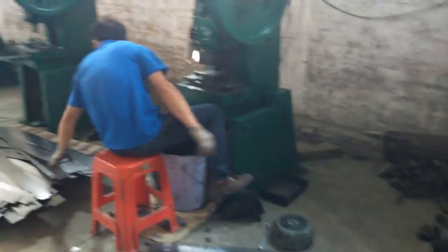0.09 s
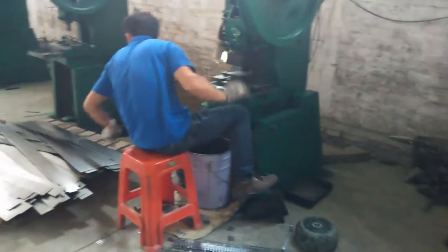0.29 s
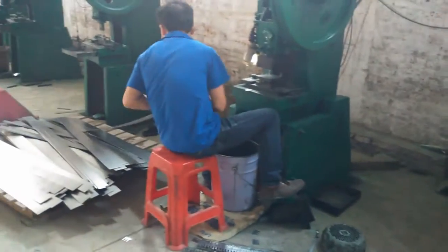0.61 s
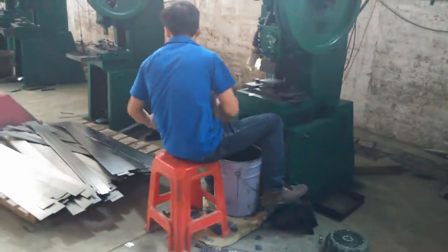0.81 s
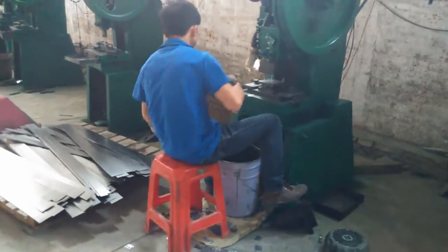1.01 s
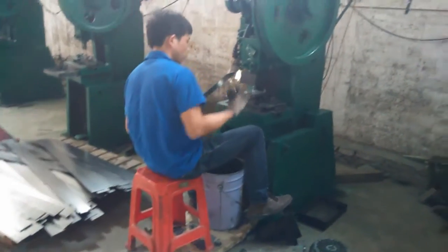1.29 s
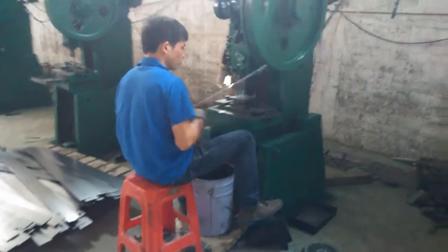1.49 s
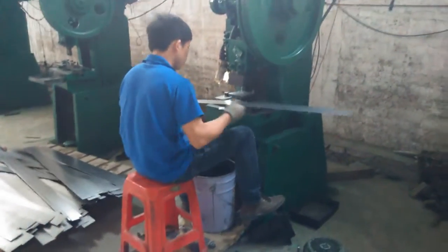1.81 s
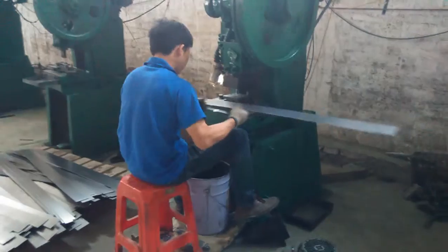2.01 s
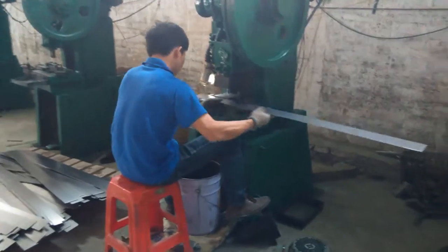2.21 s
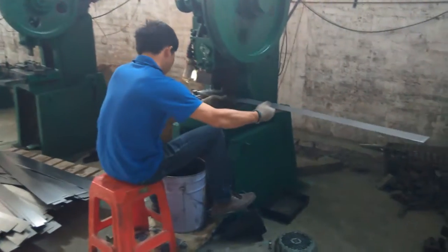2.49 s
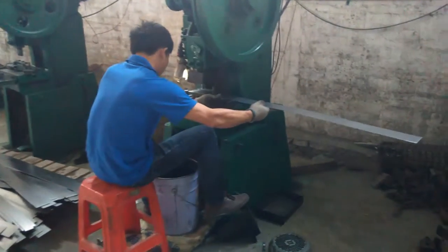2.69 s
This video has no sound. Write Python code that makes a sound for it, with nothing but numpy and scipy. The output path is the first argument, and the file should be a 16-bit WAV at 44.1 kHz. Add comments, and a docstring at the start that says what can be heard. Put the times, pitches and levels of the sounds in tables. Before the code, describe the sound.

Thin steel strip handling: bright raspy scrape first, a metallic clatter, deep springy wub-wub flexing, then a fine fading sliding hiss, mostly toward the left, over low idling machine rumble in a hard-walled workshop.

```python
"""Steel strip onto an idling punch press

A worker draws a long steel strip off a pile, swings it onto the press and slides it over the die.
Grains of noise make it hiss as it drags and clatter where it touches; a brief ring follows each grain.
Resonant noise and sinking tones boom as it flexes; wavering tones squeak at its edge.
The press motor and flywheel drone on as resonant noise in a bare workshop."""
import sys
import numpy as np
from scipy import signal
from scipy.fft import rfft, irfft
from scipy.io import wavfile
from scipy.ndimage import uniform_filter1d, map_coordinates

SR = 44100
rng = np.random.default_rng(int(sys.argv[2]) if len(sys.argv) > 2 else 0)


def waveform_to_disk(signal):
    """Save audio, clipped to [-1, 1], as 16-bit WAV at the path in sys.argv[1]."""
    frames = np.transpose(np.atleast_2d(signal))
    scaled = np.clip(frames, -1, 1) * 32767
    samples = np.round(scaled).astype(np.int16)
    wavfile.write(sys.argv[1], SR, samples)


N = 125685
T = np.arange(N) / SR


def amp(db):
    """Decibels to gain."""
    return 10 ** (np.asarray(db) / 20)


def unit(x):
    """Scale to rms 1."""
    return x / np.sqrt(np.mean(x ** 2))


def pan(db):
    """Left and right gains for a left-minus-right level, fixed or moving."""
    half = np.asarray(db) / 2
    gains = amp(np.array([half, -half]))
    return gains[:, None] if np.ndim(db) == 0 else gains


def freqs():
    """Frequency of each spectral bin, kept above zero for the logarithm."""
    return np.maximum(np.fft.rfftfreq(N, 1 / SR), 1)


def colour(x, points):
    """Shape the spectrum by (pitch_hz, relative_db) points, falling steeply beyond the ends; rms 1."""
    hz, db = np.array(points, float).T
    f = np.log(freqs())
    outside = np.maximum(np.log(hz[0]) - f, 0) + np.maximum(f - np.log(hz[-1]), 0)
    gain = amp(np.interp(f, np.log(hz), db) - 26 * outside)
    return unit(irfft(rfft(x) * gain, N))


def resonate(x, modes):
    """Pass through steep resonances, each width_hz wide about 9 dB below its peak; rms 1."""
    power = 0
    for hz, width, db in modes:
        detune = (freqs() - hz) / (0.36 * width)
        power = power + amp(db) ** 2 / (1 + detune ** 2) ** 2
    return unit(irfft(rfft(x) * np.sqrt(power), N))


def air(apart_hz):
    """Noise at two ears: alike in the bass, unrelated well above apart_hz."""
    mid, side = rng.standard_normal((2, N))
    alike = .9 / (1 + (freqs() / apart_hz) ** 4)
    shared = rfft(mid) * np.sqrt(1 + alike)
    opposed = rfft(side) * np.sqrt(1 - alike) * np.array([[1], [-1]])
    return irfft(shared + opposed, N)


def grains(per_s=3000, spread_db=-2.5):
    """Dense tiny impacts of steel on steel, each scattered differently toward the two ears."""
    strengths = amp(spread_db * np.minimum(rng.exponential(size=N), 4))
    impacts = (rng.random(N) < per_s / SR) * strengths
    # The energy of each impact fades with a time constant of 0.47 ms
    energy = signal.lfilter([1], [1, -np.exp(-1 / (0.00047 * SR))], impacts ** 2)
    return np.sqrt(energy + 1e-12) * rng.standard_normal((2, N))


def swell(start, rise, fade):
    """Linear rise, then exponential fade with time constant fade."""
    return np.clip((T - start) / rise, 0, 1) * np.exp(-np.maximum(T - start - rise, 0) / fade)


def sink(start, hz, glide_per_s):
    """A tone of rms 1 whose pitch falls from hz as a bend relaxes."""
    pitch = hz * np.exp(-glide_per_s * np.maximum(T - start, 0)) * (T >= start)
    return np.sqrt(2) * np.sin(2 * np.pi * np.cumsum(pitch) / SR)


def linger(x, t60, wet_db):
    """Add a dense decaying tail, different at each ear, keeping the overall power."""
    tail = rng.standard_normal((2, SR)) * np.exp(-np.log(1000) * T[:SR] / t60)
    tail /= np.sqrt(np.sum(tail ** 2, axis=1, keepdims=True))
    wet = signal.fftconvolve(x, tail, axes=1)[:, :N]
    return (x + amp(wet_db) * wet) / np.hypot(1, amp(wet_db))


def sway(x):
    """Let the pitch wander slightly, as under uneven running, by a random delay."""
    sway_s, sways_per_s = .0012, 6
    knots = rng.standard_normal(int(T[-1] * sways_per_s) + 2)
    lag = sway_s * map_coordinates(knots, [T * sways_per_s])
    return np.array([np.interp(T + lag, T, ear) for ear in x])


# Resonances of the press frame: pitch_hz, width_hz, relative_db
PRESS_MODES = [(132.3, 26, 3), (186, 20, -12), (243.7, 27, 1.5), (298, 36, -5.5), (365, 22, -6.5),
               (434.5, 28, -1), (507, 24, -3.5), (613, 30, 0.5), (680.5, 100, 0), (827, 55, 2),
               (892, 54, 3), (964, 36, -0.5), (1109, 32, -0.5)]
# Tone of the workshop noise: pitch_hz, relative_db
SHOP_COLOUR = [(25, -22), (60, -5.5), (95, -8.5), (140, 2), (300, -3.5), (700, -2.5), (1080, 2),
               (1200, -9.5), (1330, -13.5), (1550, -8), (2200, -12), (2750, -11), (3500, -19.5),
               (6000, -22), (15500, -38)]
# Tone of the thin steady hiss: pitch_hz, relative_db
HISS_COLOUR = [(2500, -39), (4500, -15.5), (6500, -10), (8500, 3), (10300, 4.5), (11500, 1), (12800, -8),
               (15500, -9)]
PRESS_DB, SHOP_DB, HISS_DB = -36.5, -38.5, -40
PRESS_PAN_DB, SHOP_PAN_DB, HISS_PAN_DB = 2.5, 2, 15.5  # left minus right


def idle():
    """Motor and flywheel rumble in the press frame, over workshop noise and a thin steady hiss."""
    press = sway(resonate(air(apart_hz=696), PRESS_MODES)) * amp(PRESS_DB) * pan(PRESS_PAN_DB)
    shop = colour(air(apart_hz=520), SHOP_COLOUR) * amp(SHOP_DB) * pan(SHOP_PAN_DB)
    hiss = colour(air(apart_hz=500), HISS_COLOUR) * amp(HISS_DB) * pan(HISS_PAN_DB)
    return press + shop + hiss


# Squeaks and pings of the edge:
# start_s, rise_s, fade_s, pitch_hz, waver_hz (rms), level_db, left_minus_right_db
SQUEAKS = [(0.214, 0.035, 0.025, 10420, 75, -28.5, 28.5), (0.388, 0.02, 0.14, 8230, 360, -23.5, 0),
           (0.783, 0.0068, 0.033, 10640, 450, -24, 23.5), (0.785, .006, .025, 14700, 500, -33, 18),
           (1.16, 0.016, 0.067, 1660, 90, -32, 7), (1.384, 0.01, 0.12, 8450, 69.8, -23.5, 7),
           (1.425, 0.032, 0.079, 802, 9.2, -27.5, 0), (1.766, 0.0063, 0.023, 6540, 230, -31.5, 19),
           (1.786, 0.0096, 0.019, 1830, 98, -29.5, 17), (1.849, 0.0059, 0.019, 10930, 290, -23, 21),
           (1.87, 0.014, 0.08, 9540, 72, -26, 17), (1.95, 0.012, 0.056, 10600, 54, -27.5, 20),
           (2.235, 0.013, 0.038, 8550, 222, -31, 22.5), (2.285, 0.016, 0.016, 808, 23.6, -30, 7.5),
           (2.345, 0.05, 0.077, 809, 14, -30, 7), (2.471, 0.02, 0.043, 10410, 93, -31, 26),
           (2.466, 0.023, 0.032, 9300, 52, -27.5, 17.5), (2.475, .012, 0.022, 14400, 90, -41, 18)]
WAVERS_PER_S = 560  # the random waver is averaged over one such period


def squeaks():
    """The edge catches and sings on one wavering mode."""
    out = 0
    for start, rise, fade, hz, waver_hz, db, side_db in SQUEAKS:
        waver = unit(uniform_filter1d(rng.standard_normal(N), int(SR / WAVERS_PER_S)))
        phase = 2 * np.pi * np.cumsum(hz + waver_hz * waver) / SR
        tone = np.sqrt(2) * np.sin(phase + 2 * rng.random((2, 1)))  # own phase at each ear
        out = out + tone * swell(start, rise, fade) * amp(db) * pan(side_db)
    return out


# Slow flaps of the free end: start_s, pitch_hz (at the start), level_db
FLAPS = [(1.107, 206, -29.5), (1.15, 164.6, -29), (1.224, 184, -32), (1.285, 160, -34.5),
         (1.428, 171, -32.5), (1.571, 170, -23), (1.691, 167, -25.5), (1.815, 149.3, -27.5),
         (2.028, 167, -33.5), (2.105, 147, -30)]
FLAP_GLIDE_PER_S, FLAP_RISE_S, FLAP_FADE_S = 3.68, 0.015, 0.03
FLAP_PAN_DB = 5  # left minus right


def flaps():
    """The free end flaps: a low sinking note at each swing."""
    notes = 0
    for start, hz, db in FLAPS:
        tone = sink(start, hz, FLAP_GLIDE_PER_S)
        notes = notes + tone * swell(start, FLAP_RISE_S, FLAP_FADE_S) * amp(db)
    return notes * pan(FLAP_PAN_DB)


# Buckles, where the bend snaps through:
# start_s, fade_s, pitch_hz (at the start), level_db, left_minus_right_db
BUCKLES = [(1.494, 0.028, 360.5, -10, 1), (1.54, 0.017, 364, -18.5, 4), (1.584, 0.013, 342, -22, 5),
           (1.638, 0.015, 346, -20, 3), (1.67, 0.0073, 355, -11, 1.5), (1.74, 0.025, 349.5, -18.5, 6),
           (1.824, 0.007, 345, -19.5, 6), (1.871, 0.0084, 347, -23, 6), (1.953, .014, 403, -29, 1),
           (2.058, 0.016, 365, -32, 1), (2.125, 0.032, 330, -31, 4), (2.188, 0.012, 376, -30, 5),
           (2.212, .01, 477, -26, 4), (2.368, 0.013, 426, -28, 1)]
BUCKLE_GLIDE_PER_S, BUCKLE_RISE_S = 2.2, 0.006


def buckles():
    """Each snap of the bend gives a short sinking 'wub'."""
    out = 0
    for start, fade, hz, db, side_db in BUCKLES:
        tone = sink(start, hz, BUCKLE_GLIDE_PER_S)
        out = out + tone * swell(start, BUCKLE_RISE_S, fade) * amp(db) * pan(side_db)
    return out


# Flexes of the strip: start_s, rise_s, fade_s, boom_db, rumble_db, left_minus_right_db
FLEXES = [(1.105, 0.014, 0.21, -29.5, -26.5, 3.5), (1.215, 0.012, 0.046, -39, -36, 2.5),
          (1.422, 0.01, 0.12, -44, -26.5, 4), (1.482, 0.0039, 0.1, -17, -19.5, -3.5),
          (1.509, 0.037, 0.29, -23.5, -16.5, 3.5), (1.799, 0.0074, 0.31, -26, -32.5, 4.5),
          (1.93, 0.026, 0.2, -33, -23.5, 1.5), (2.19, 0.014, 0.074, -46, -40, -6)]
# Bending modes of the strip: pitch_hz, width_hz, relative_db
BENDING_MODES = [(175, 20, -13), (235, 12, -15), (320.3, 54, -2.5), (398, 29, -7.5), (397.7, 68, -2.5),
                 (504.7, 23, 0), (568, 26, -3.5), (639, 32, -3.5), (808, 15, -10), (966, 100, -17)]
# Tone of the broad rumble: pitch_hz, relative_db
RUMBLE_COLOUR = [(40, -24), (95, -18), (160, -4), (240, -2.5), (350, 3), (520, -1), (750, -2.5),
                 (1100, -10), (1600, -13), (2600, -41)]


def flex():
    """The long strip buckles and whips, booming in its bending modes like a thunder sheet."""
    boom_power, rumble_power = 0, 0
    for start, rise, fade, boom_db, rumble_db, side_db in FLEXES:
        force = swell(start, rise, fade) * pan(side_db)
        boom_power = boom_power + (force * amp(boom_db)) ** 2
        rumble_power = rumble_power + (force * amp(rumble_db)) ** 2
    boom = resonate(air(apart_hz=660), BENDING_MODES) * np.sqrt(boom_power)
    rumble = colour(air(apart_hz=655), RUMBLE_COLOUR) * np.sqrt(rumble_power)
    return boom + rumble


# Slide over the die: time_s, level_db
SLIDE_LEVELS = [(1.761, -28), (1.83, -29.5), (1.87, -34), (1.95, -28), (2.02, -37), (2.1, -28.5),
                (2.2, -33.5), (2.36, -33), (2.45, -34), (2.56, -30.5), (2.68, -33), (2.85, -43)]
# Tone of the slide: pitch_hz, relative_db
SLIDE_COLOUR = [(1200, -45), (2200, -40), (3400, -25), (5400, -14), (6400, -5), (8200, 5.5), (9500, 12),
                (11200, 9), (12500, 0), (15500, -7)]
SLIDE_PAN_DB = 10  # left minus right, before shade()


def slide():
    """The strip is pushed along the die, its fine grains blurring into a hiss."""
    time, db = np.array(SLIDE_LEVELS).T
    level = amp(np.interp(T, time, db, left=-100))
    return colour(grains(), SLIDE_COLOUR) * level * pan(SLIDE_PAN_DB)


# Drag over the pile: time_s, level_db (before DRAG_BOOST_DB), left_minus_right_db (before shade())
DRAG_LEVELS = [(0.19, -39, 5), (0.26, -36, 13), (0.345, -28, -1), (0.385, -30, 7), (0.42, -25, 7),
               (0.514, -23.5, 3), (0.614, -15, 2.5), (0.7, -19.5, 5.5), (0.758, -19.5, 4),
               (0.806, -29.5, 14), (0.89, -23.5, 4), (0.976, -18.5, 2.5), (1.072, -31.5, 9),
               (1.13, -19.5, -2)]
# Tone of the drag: pitch_hz, relative_db
DRAG_COLOUR = [(2500, -23), (3500, -30), (4400, -26.5), (5200, -22), (6400, -14), (7100, -10), (8000, -4),
               (9600, 1), (10900, -5), (12600, -14.5), (15500, -21.5)]
DRAG_BOOST_DB = 2.5


def drag():
    """The strip rasps over the others in the pile, a stream of equally strong grains."""
    time, db, side_db = np.array(DRAG_LEVELS).T
    edges = np.r_[time[0] - .05, time, time[-1] + .05]
    level = np.interp(T, edges, np.r_[-80, db, -80])
    gains = pan(np.interp(T, time, side_db))
    gains = gains / np.sqrt(np.mean(gains ** 2, axis=0))  # panning keeps the power
    rasp = colour(grains(per_s=1800, spread_db=0), DRAG_COLOUR)
    return rasp * amp(level + DRAG_BOOST_DB) * gains


# Contacts of the strip: start_s, rise_s, fade_s, clang_db, rattle_db, sizzle_db,
# left_minus_right_db (of the sizzle, before shade())
CONTACTS = [(0.786, 0.0093, 0.038, -55, -54, -25.5, 4), (1.092, 0.05, 0.13, -28, -33, -16, 4),
            (1.146, 0.011, 0.11, -25.5, -22, -19, 10.5), (1.371, 0.016, 0.15, -30.5, -21, -21.5, 16),
            (1.477, 0.029, 0.17, -17.5, -28.5, -21, 9), (1.766, 0.008, 0.021, -33, -29.5, -32, 11),
            (1.791, 0.012, 0.093, -21.5, -27, -29.5, 17.5), (1.855, 0.012, 0.071, -27.5, -27, -27, 16),
            (1.891, 0.0093, 0.13, -27, -26, -22.5, 13.5), (1.991, 0.0087, 0.11, -26.5, -27, -22, 12),
            (2.232, 0.0041, 0.064, -52, -59, -28, 10), (2.804, 0.0048, 0.042, -42, -43, -37, 19)]
# Tones of the three bands, each: pitch_hz, relative_db
CLANG_COLOUR = [(600, 2.5), (1000, 2.5), (1400, -3), (1800, -1.5), (2400, -0.5), (3000, -8.5), (4600, -12),
                (6000, -32), (9000, -24)]
RATTLE_COLOUR = [(2500, 1), (3300, -5.5), (4000, -1.5), (4700, 1.5), (5400, 1.5), (6300, -1), (7400, 2.5)]
SIZZLE_COLOUR = [(2000, -17.5), (3500, -18.5), (5200, -6), (6200, -12), (8500, 1.5), (10000, 2),
                 (11300, -1.5), (12500, -14), (15500, -15.5)]
CLANG_PAN_DB, RATTLE_PAN_DB = 2.5, 8.5  # left minus right, before shade()


def clatter():
    """Each contact chatters and dies away: a clang in the middle, a coarse rattle above, a sizzle on top."""
    clang_power, rattle_power, sizzle_power = 0, 0, 0
    for start, rise, fade, clang_db, rattle_db, sizzle_db, side_db in CONTACTS:
        force = swell(start, rise, fade)
        clang_power = clang_power + (force * amp(clang_db) * pan(CLANG_PAN_DB)) ** 2
        rattle_power = rattle_power + (force * amp(rattle_db) * pan(RATTLE_PAN_DB)) ** 2
        sizzle_power = sizzle_power + (force * amp(sizzle_db) * pan(side_db)) ** 2
    clang = colour(grains(), CLANG_COLOUR) * np.sqrt(clang_power)
    rattle = colour(grains(per_s=1300, spread_db=1.5), RATTLE_COLOUR) * np.sqrt(rattle_power)
    sizzle = colour(grains(), SIZZLE_COLOUR) * np.sqrt(sizzle_power)
    return clang + rattle + sizzle


PATCH_DB, PATCH_HZ, PATCH_S = 3.5, 140, .055  # depth and grid of the random patches


def shimmer(x):
    """As the point of contact travels, it favours ever different groups of the strip's dense modes."""
    f, t, spec = signal.stft(x, SR, nperseg=512)
    field = rng.standard_normal((int(f[-1] / PATCH_HZ) + 2, int(t[-1] / PATCH_S) + 2))
    places = np.meshgrid(f / PATCH_HZ, t / PATCH_S, indexing="ij")
    gain = amp(PATCH_DB * np.clip(map_coordinates(field, places), -2, 2))
    return signal.istft(spec * unit(gain), SR)[1][:, :N]


RING_T60_S, RING_DB, RING_CHANGE_S = 0.058, 1.5, .06


def ring(x):
    """Each impact rings briefly in the strip; the ring keeps changing as the strip bends."""
    size = int(.15 * SR)
    hop = int(RING_CHANGE_S * SR)
    decay = np.exp(-np.log(1000) * T[:size] / RING_T60_S)
    decay = decay / np.sqrt(np.sum(decay ** 2))
    padded = np.pad(x, ((0, 0), (hop, 2 * hop + size)))
    wet = np.zeros_like(padded)
    # Overlapping stretches each get a fresh noise tail
    for i in range(0, N + hop, hop):
        tail = rng.standard_normal((2, size)) * decay
        stretch = padded[:, i:i + 2 * hop] * signal.windows.cosine(2 * hop)
        rung = signal.fftconvolve(stretch, tail, axes=1)
        wet[:, i:i + rung.shape[1]] += rung
    return (x + amp(RING_DB) * wet[:, hop:hop + N]) / np.hypot(1, amp(RING_DB))


# Gain at the right ear: pitch_hz, gain_db
RIGHT_EAR_SHADE = [(1500, -1.5), (4000, -1), (7500, 1), (10000, -5.5), (13000, -9.5)]


def shade(x):
    """The right ear faces away from the strip and hears it duller."""
    hz, db = np.array(RIGHT_EAR_SHADE, float).T
    gain = amp(np.interp(np.log(freqs()), np.log(hz), db))
    return np.array([x[0], irfft(rfft(x[1]) * gain, N)])


ROOM_T60_S = 1


def scene():
    """The ringing strip in the workshop beside the idling press."""
    background = idle()
    bending = linger(flex() + flaps() + buckles(), ROOM_T60_S, wet_db=-11.5)
    steel = shade(ring(shimmer(drag() + slide() + clatter())))
    return background + bending + linger(steel + squeaks(), ROOM_T60_S, wet_db=-14)


TOP_HZ = 15850


def record(dry):
    """Round the highest peaks smoothly and cut everything above TOP_HZ steeply."""
    rounded = dry / (1 + (dry / .85) ** 6) ** (1 / 6)
    low_pass = signal.ellip(10, .2, 80, TOP_HZ, fs=SR, output="sos")
    return signal.sosfilt(low_pass, rounded)


dry = scene()
out = record(dry)
waveform_to_disk(out)
```